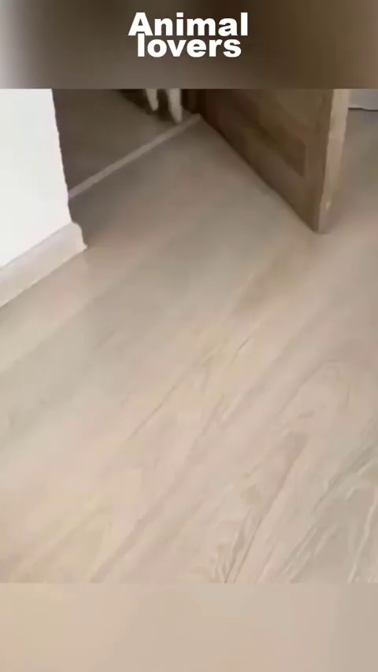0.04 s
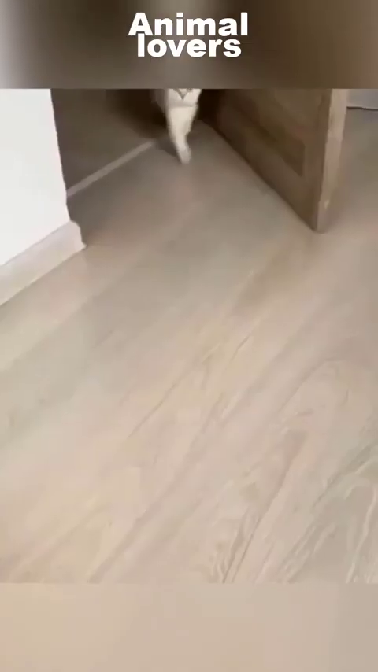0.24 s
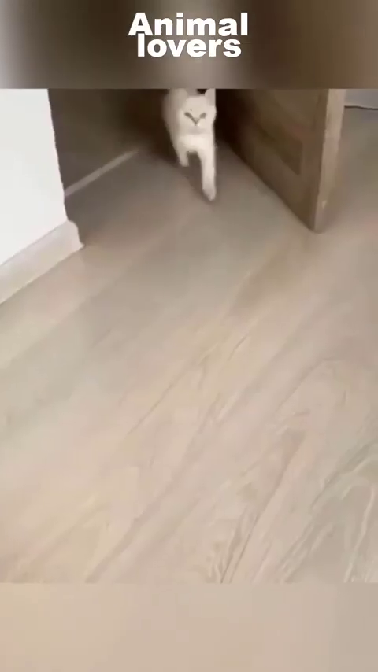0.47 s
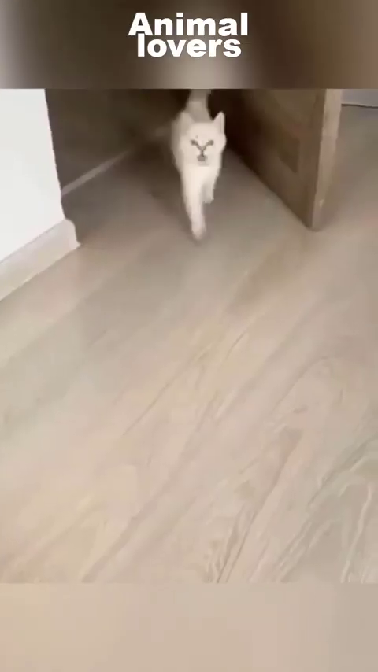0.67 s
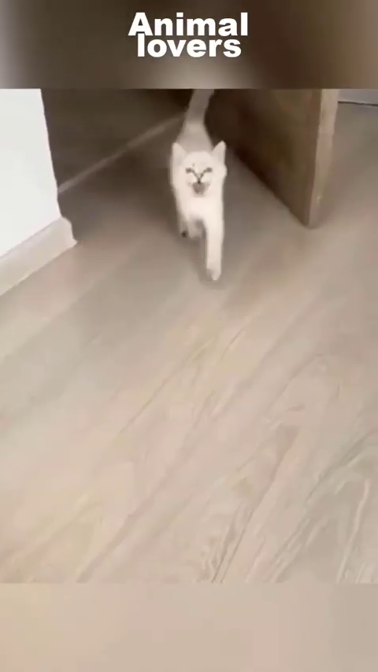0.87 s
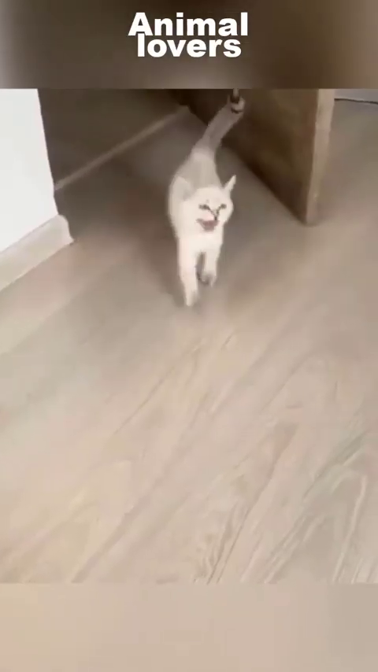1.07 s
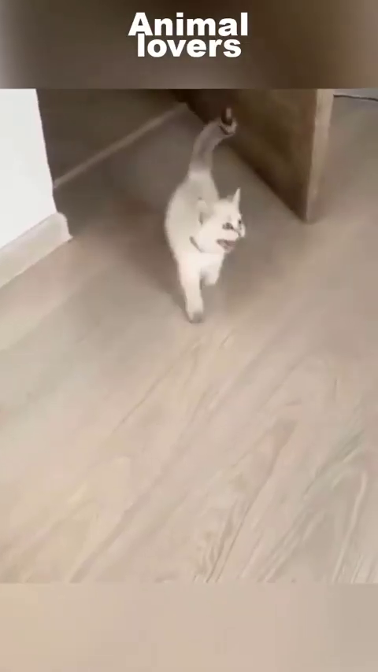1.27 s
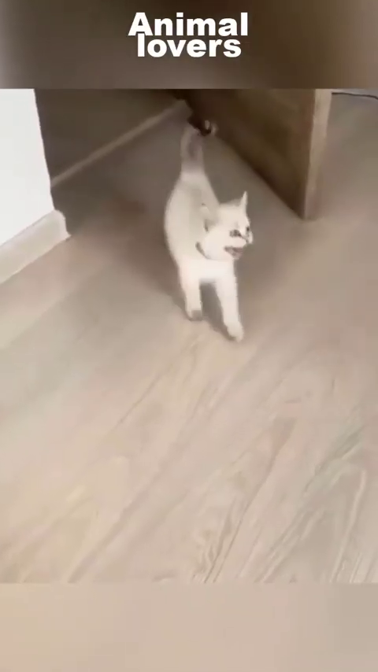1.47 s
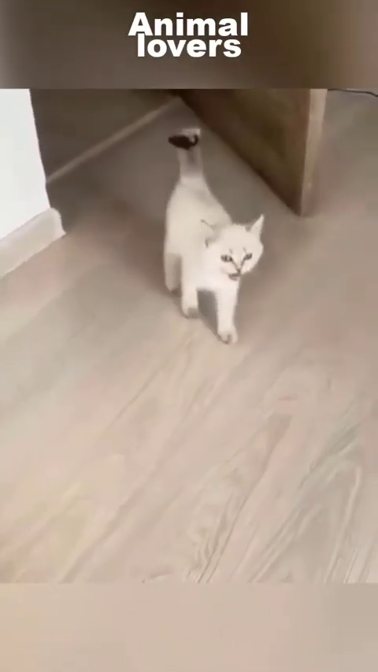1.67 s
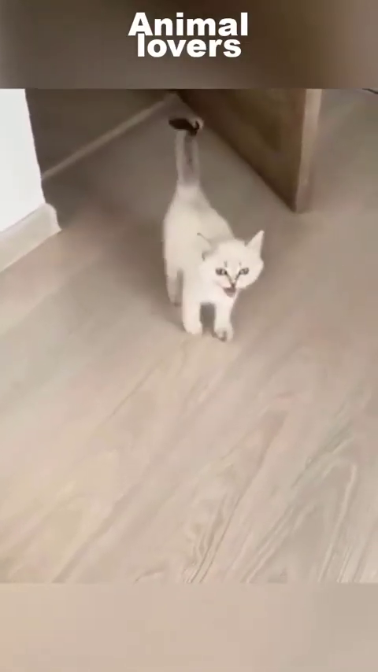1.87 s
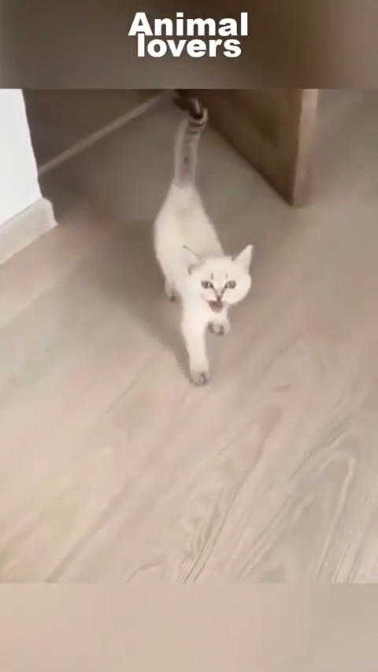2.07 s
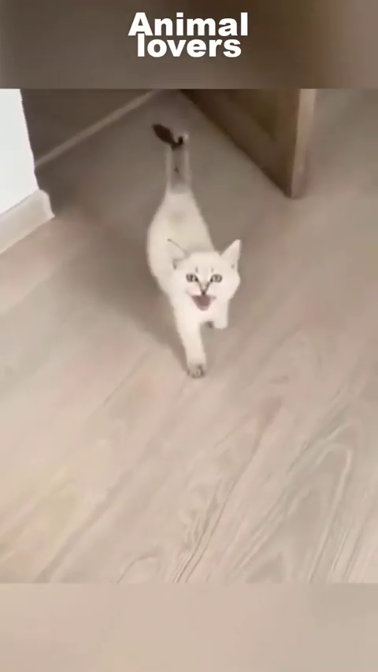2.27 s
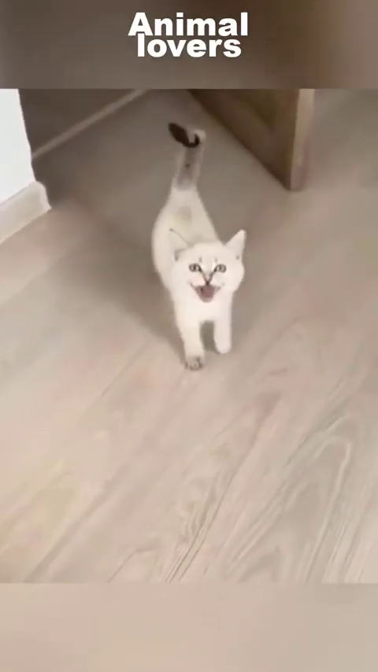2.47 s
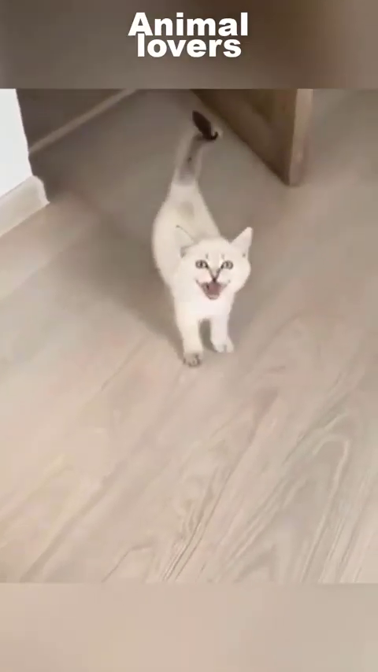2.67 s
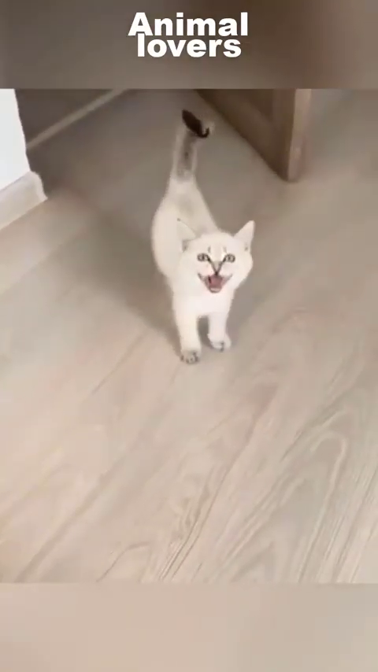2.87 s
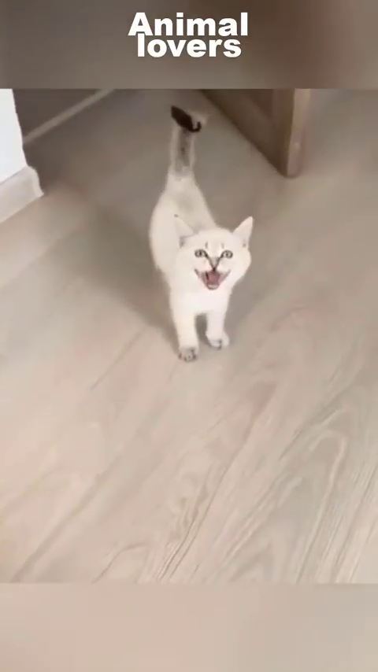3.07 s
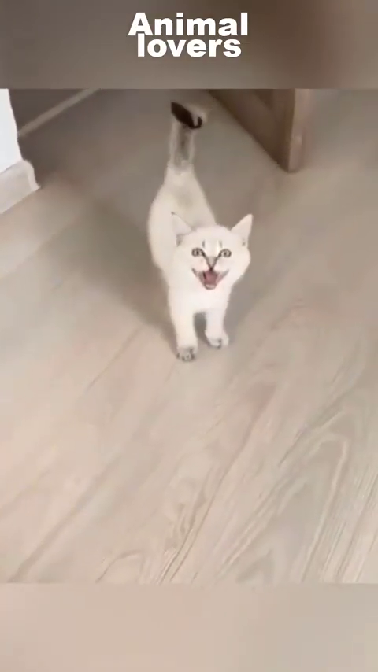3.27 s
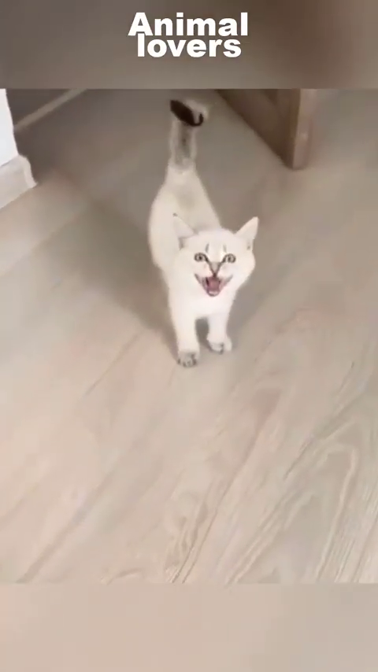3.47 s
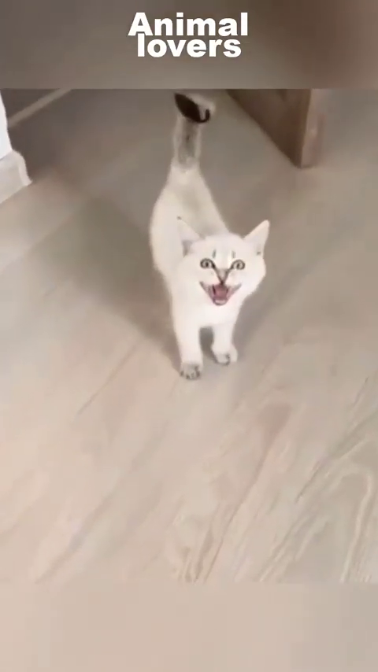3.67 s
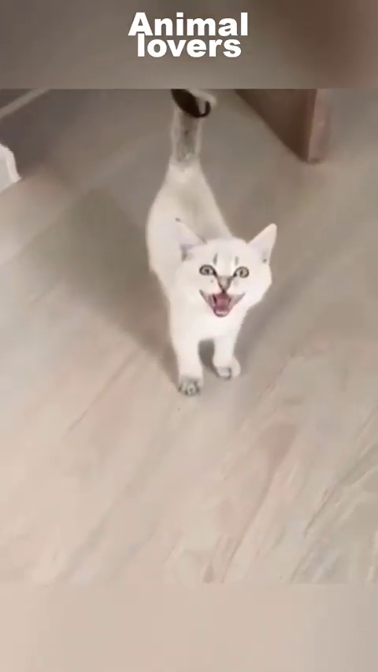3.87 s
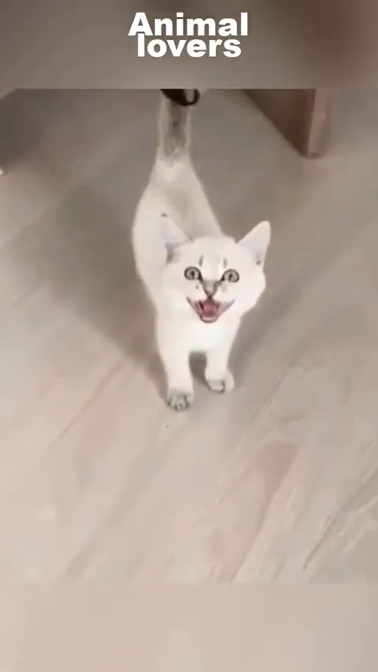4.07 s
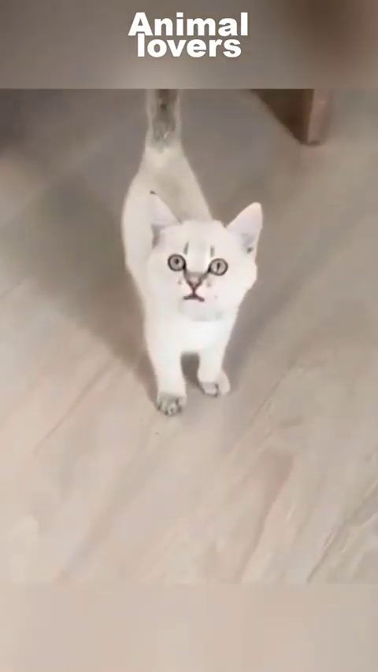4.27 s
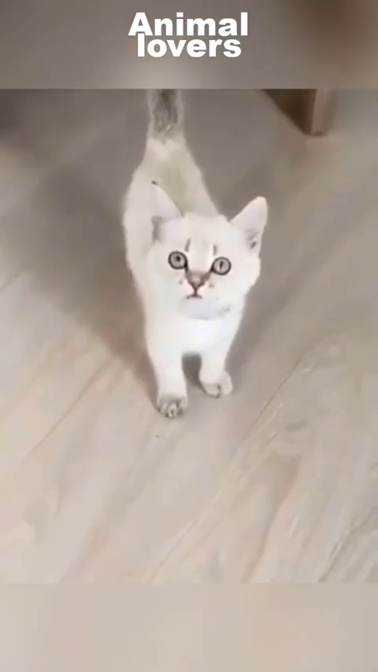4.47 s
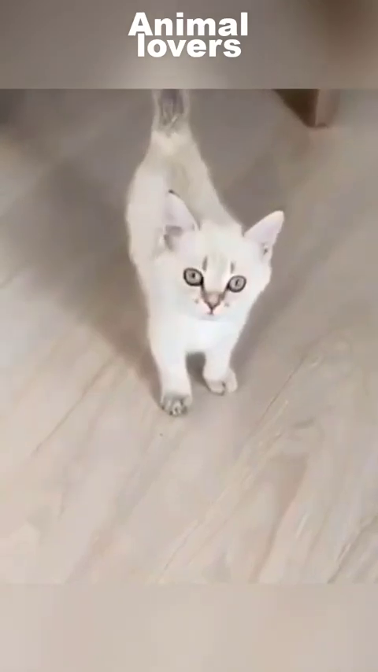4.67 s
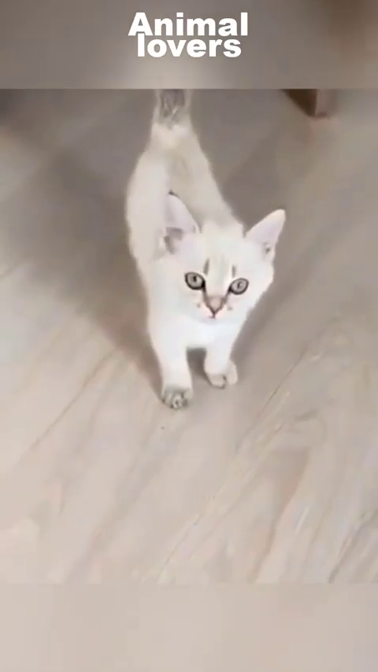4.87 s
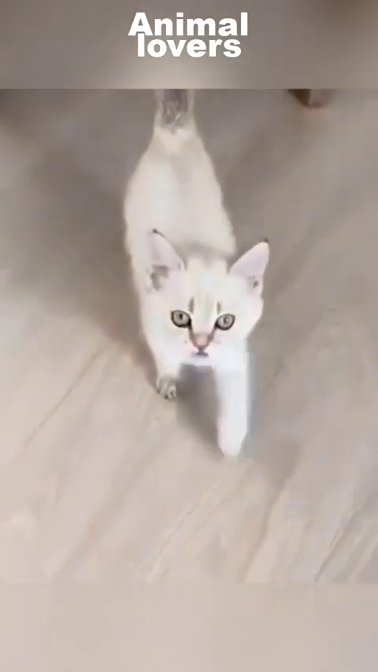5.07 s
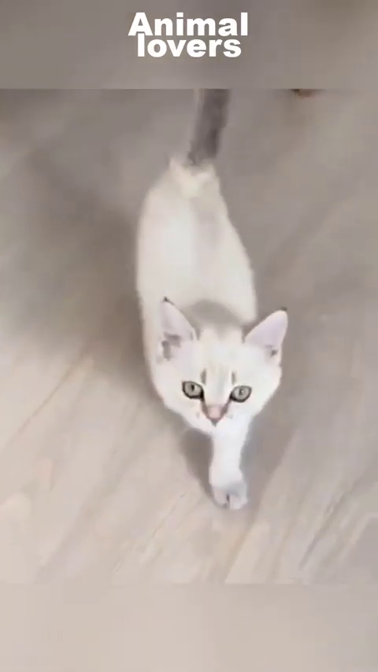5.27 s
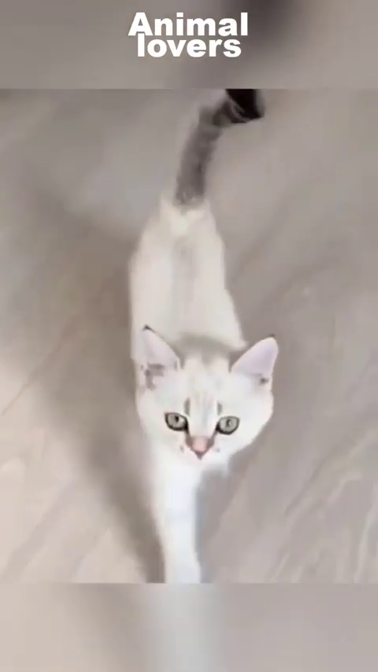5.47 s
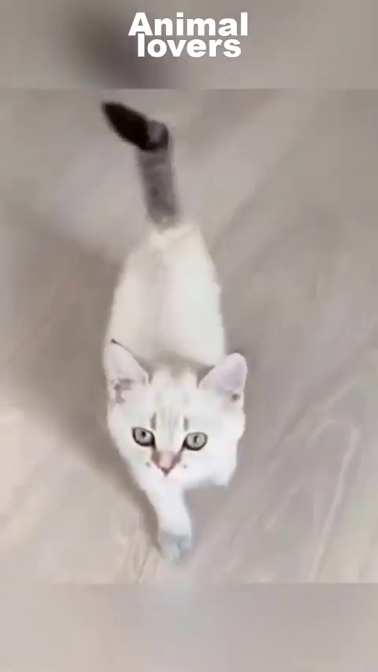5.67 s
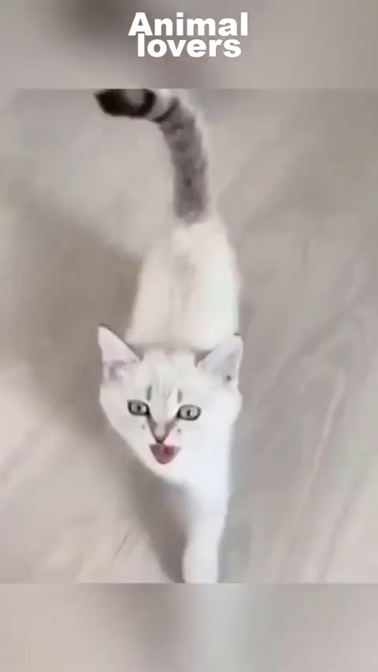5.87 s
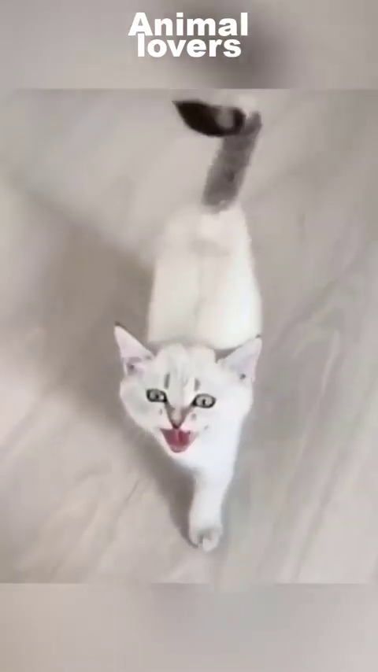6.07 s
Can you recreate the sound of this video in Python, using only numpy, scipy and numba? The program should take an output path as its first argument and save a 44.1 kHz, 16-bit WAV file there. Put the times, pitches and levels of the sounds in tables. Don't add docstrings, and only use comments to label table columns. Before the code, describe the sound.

A kitten gives one long, high, wavering meow that swells and sinks, cracks shut, then lip smacks, claw ticks and a new rough cry starting.

```python
import sys
import numpy as np
from scipy import signal
from scipy.fft import rfft, irfft
from scipy.io import wavfile
from scipy.ndimage import uniform_filter1d
from numba import njit

SR = 44100
rng = np.random.default_rng(int(sys.argv[2]) if len(sys.argv) > 2 else 0)


def volts(x):
    e = np.asarray(x, float) / 20
    return 10 ** e


def wav_out(sig):
    wavfile.write(sys.argv[1], SR, np.round(np.clip(np.atleast_2d(sig).T, -1, 1) * 32767).astype(np.int16))


N = 270333
T = np.arange(N) / SR
STEP = 32
BAND = 16

# t/s, f/Hz
RISE_HZ = [(1.02, 862), (1.086, 1000), (1.125, 952), (1.226, 1037), (1.27, 945), (1.335, 892), (1.41, 912),
           (1.635, 835), (1.9, 822)]
# t/s, f/Hz
HOLD_HZ = [(2.03, 878), (2.11, 901), (2.325, 891), (2.4, 857), (2.8, 841), (2.99, 819), (3.45, 808),
           (3.8, 795), (4.16, 787)]
# t/s, level/dB
ATTACK_DB = [(1.0, -59), (1.108, -43), (1.196, -47), (1.268, -35), (1.344, -41.5), (1.4, -36)]
# t/s, level/dB
EFFORT_DB = [(1.5, -38.5), (1.58, -34), (1.85, -39), (2.54, -26.5), (3.3, -27.5), (3.58, -20.5),
             (3.96, -24), (4.0, -19), (4.33, -24)]
# t/s, roughness/0-1
ROUGHNESS = [(1.0, .6), (1.07, .12), (1.12, .06), (1.45, .04), (2.7, .035), (3.4, .04), (4.17, .055),
             (4.22, .22), (4.33, .33)]
# t/s, pitch dip/share, added roughness/0-1, roughness length/s
CATCHES = [
    (1.676, .04, .26, .03),
    (2.39, .01, .06, .03),
    (3.72, 0, .03, .08),
    (4.242, .06, .04, .01),
    (4.275, .06, .04, .01),
    (4.312, .06, .04, .01),
    (4.332, .05, 0, .01),
    (4.352, .07, 0, .01),
]
# t/s, length/s, level/dB
FUNDAMENTAL_FADES = [
    (1.617, 0.11, -7.5),
    (2.508, 0.043, -32),
    (3.241, .03, -10),
    (3.5, 0.14, -4.5),
]
# t/s, first resonance/Hz, second resonance/Hz, lift of second/dB
MOUTH = [(1.05, 2160, 4790, 7), (1.3, 2050, 5820, -5.5), (1.65, 2050, 3150, 14.5), (1.9, 2190, 3390, -5.5),
         (2.3, 2440, 3830, 15), (2.9, 2310, 3420, 8.5), (3.25, 2360, 3770, 7.5), (3.55, 2400, 3980, 14.5),
         (4.2, 1780, 3866, 17.5)]
# f/Hz, level/dB
THROAT_DB = [(1100, -8.5), (1700, 1), (2500, -0.5), (3150, -1.5), (4000, -1), (5000, -0.5), (5800, -2.5),
             (6500, -15.5)]
# f/Hz, level/dB
TREBLE_DB = [(6500, -32), (7400, -15), (8000, 2.5), (9500, 6), (11000, 0), (13000, -15.5), (14000, -20)]
# level/dB, pitch/Hz, fundamental/dB, second resonance/Hz
NEXT_CRY = (-36, 829.5, -2.2, 2288)
# t/s, peak/dB, ring/Hz, lower ring/dB, hoarse air after/dB
SMACKS = [
    (0.387, -41, 4900, -19, -24),
    (0.789, -43, 5030, -22, -32),
    (0.919, -51, 2800, -22, -30),
    (0.943, -31.5, 5200, -38, -17),
    (1.049, -29.5, 5560, -35, -26),
    (5.5379, -18, 4720, -8.5, -27),
    (5.7948, -24, 4200, -22, -25.5),
    (6.0142, -13, 4770, -3.5, -27.5),
]
# t/s, peak/dB, ring/Hz
TICKS = [
    (4.448, -25.5, 1063),
    (5.048, -45.5, 2090),
    (5.109, -41.5, 975),
    (5.236, -45, 939),
    (5.335, -43, 1057),
    (5.484, -45.5, 990),
    (6.11, -28, 843),
]
# t/s, peak/dB, f/Hz, t60/s, swell/s
BUMPS = [
    (.99, -49.5, 745, 0.028, 0.017),
    (3.36, -38, 624, 0.015, 0.0061),
    (3.696, -19.5, 551, 0.032, 0.02),
    (4.452, -28, 199, 0.11, 0.007),
    (4.47, -33, 363, 0.061, 0.0038),
]
# t/s, rise/s, fall/s, handling/dB, rumble re handling/dB
STIRS = [(.48, 0.055, 0.061, -47.5, -3), (.6, 0.071, 0.034, -45, -5), (.88, 0.21, 0.034, -57, 2.5),
         (1.0, 0.015, 0.089, -67, 11.5), (4.45, 0.034, .1, -41, -24), (4.82, .03, .06, -57, 11.5),
         (5.18, 0.083, 0.059, -43.5, 0.5), (5.26, 0.097, 0.13, -42.5, -8), (5.56, 0.051, 0.026, -47.5, 0),
         (5.67, .02, .05, -49.5, 2.5), (5.79, 0.074, 0.25, -46, -0.5), (6.06, .12, .2, -49, 0)]
# t/s, rise/s, fall/s, level/dB, sheen re level/dB
SCUFFS = [(.4, 0.17, 0.054, -79, 3.5), (.56, 0.11, 0.095, -66.5, -9), (.784, 0.017, .04, -71, 2),
          (.95, 0.034, 0.9, -66, 2), (4.75, 2.28, 0.28, -53, -22.5), (5.14, 0.096, 0.06, -61.5, -19),
          (5.23, 0.06, 0.088, -55.5, -9), (5.345, 0.06, 0.032, -54.5, -4), (5.486, 0.01, 0.028, -53.5, -11),
          (5.57, .02, 0.037, -63, 5), (5.67, 0.01, 0.11, -51.5, -22), (5.81, .04, 0.067, -49.5, -7.5),
          (5.95, .08, 0.087, -58, -10.5), (6.06, 0.028, 0.13, -45, -10)]
# f/Hz, level/dB per Hz
RUMBLE_SPECTRUM = [(12, -5.5), (20, -11), (65, 4), (85, 3.5), (129, -4), (140, -20), (180, -44),
                   (310, -120)]
# f/Hz, level/dB per Hz
HANDLING_SPECTRUM = [(82, -27), (140, 3.5), (296, -1.5), (372, -6), (524, -17.5), (700, -18), (910, -25),
                     (1540, -120)]
# f/Hz, level/dB per Hz
SHUFFLE_SPECTRUM = [(290, -12), (500, 0), (1000, -4), (1630, -2), (2250, -2.5), (2750, -3.5), (6500, -12),
                    (8450, -84.5), (14300, -120)]
# f/Hz, level/dB per Hz
SHEEN_SPECTRUM = [(3820, -50), (6500, -11.5), (8180, -5), (8990, -5.5), (11100, -3), (13200, -16.5),
                  (13500, -30)]
# f/Hz, t60/s
ROOM_T60 = [(200, .45), (1000, .45), (3000, .42), (4500, .36), (6500, .3), (12000, .18)]
# t/s, level/dB
WETNESS_DB = [(1.0, 1), (2.2, -2.5), (3.0, -6), (4.35, -8.5), (6.1, 0)]
# start/s, end/s, level/dB
DROPOUT = (0.16, .214, -36)
# start/s, end/s
WIDE_SPANS = [(0, 1.06), (4.34, 4.46), (4.48, 5.19), (5.37, 5.49), (5.54, 5.79), (5.82, 6.13)]

EASY_DB = -32.5
BASE_DB, BASE_PER_DB, TOP_DB, TOP_PER_DB = -17, -0.52, -18.5, -0.33
WANDER = 0.036
UNSTEADY, SETTLES_S = .01, .8
TIRES_S, SAG_PER_S = 4.19, .12
SHUT_S, SHUT_LENGTH_S, RELEASE_DB_PER_S = 4.335, .12, 2596
PITCH_DROP, FIRST_DROP, SECOND_DROP = .28, 0.61, .62
SHUT_DB, SHUT_TOP_DB = -10.5, -8
NEXT_CRY_S = 6.109
RUMBLE_DB, HANDLING_DB, SHUFFLE_DB, SHEEN_DB = -57, -62.5, -69.5, -95
HUSH_DB = -12.5


def level(x):
    return x / np.sqrt(np.mean(x ** 2))


def shape(points, hz):
    f, v = np.transpose(points)
    return np.interp(np.log(np.maximum(hz, 1)), np.log(f), v)


def columns(*tables):
    s, *cols = np.transpose(np.concatenate(tables))
    return [np.interp(T, s, c) for c in cols]


def fine(control):
    return np.interp(T, T[::STEP], control)


def coloured(points):
    hz = np.arange(N // 2 + 1) * SR / N
    return level(irfft(rfft(rng.standard_normal(N)) * volts(shape(points, hz)), N))


def walk(rate_hz):
    k = int(SR / rate_hz)
    held = np.repeat(rng.standard_normal(N // k + 1), k)
    return level(uniform_filter1d(uniform_filter1d(held, k), k)[:N])


@njit
def svf(x, hz, width_hz):
    y, b, l = np.empty(len(x)), 0., 0.
    for i in range(len(x)):
        g, k = np.tan(np.pi * hz[i] / SR), width_hz / hz[i]
        v = (b + g * (x[i] - l)) / (1 + g * (g + k))
        b, l, y[i] = 2 * v - b, l + 2 * g * v, k * v
    return y


def ring(hz, t60_s):
    t = T[:SR // 4]
    return np.sin(2 * np.pi * hz * t) * np.exp(-np.log(1000) * t / t60_s)


def add(track, s, sound):
    i = int(s * SR)
    track[i:i + len(sound)] += sound[:N - i]


def kitten():
    db, hz, rough, base_db, first_hz, second_hz, top_db, second_db = controls()
    dips = sum(share * np.exp(-((T - s) / .006) ** 2) for s, share, *_ in CATCHES)
    shake = .0035 * walk(40) + .002 * walk(130)
    shake = shake + .05 * rough * walk(160) + .015 * rough * walk(400) + .08 * rough ** 2 * walk(700)
    shake = shake + UNSTEADY * walk(110) * np.exp(-np.abs(T - RISE_HZ[0][0]) / SETTLES_S)
    phase = 2 * np.pi * np.cumsum(hz * (1 - dips + shake)) / SR

    low, high, power, top_power = 0, 0, 0, 0
    for k in range(2, 19):
        f, first, second = k * hz[::STEP], first_hz[::STEP], second_hz[::STEP]
        first_lift = 2.0 / (1 + ((f - first) / 500) ** 2)
        second_lift = volts(second_db[::STEP]) / (1 + ((f - second) / 330) ** 2)
        gain = volts(shape(THROAT_DB, f)) * (1 + first_lift + second_lift) * (f < 6700)
        top = volts(shape(TREBLE_DB, f)) * (f >= 6700) * (f < 14500)
        wave = np.sqrt(2) * np.cos(k * phase + .4 * k * k) * volts(2.0 * walk(60))
        low = low + fine(gain) * wave
        high = high + fine(top) * wave
        power = power + gain ** 2
        top_power = top_power + top ** 2
    tone = volts(base_db) * np.sqrt(2) * np.cos(phase)
    tone = tone + low / fine(np.sqrt(power)) + volts(top_db) * high / fine(np.sqrt(top_power))

    puff = rng.standard_normal(N) * (1 + 0.91 * np.cos(phase))
    second_air = svf(svf(puff, second_hz, 900.), second_hz, 900.)
    mouth = level(svf(puff, first_hz, 500.) + 1.8 * second_air)
    teeth_hz = 5600 + 0 * T
    teeth = level(svf(svf(puff, teeth_hz, 2000.), teeth_hz, 2000.))
    teeth = teeth * volts(-6 + 4.0 * walk(12) - 3 * rough ** 2)
    teeth = teeth + volts(top_db + 15.5) * coloured(TREBLE_DB)
    flutter = volts(5 * rough * walk(150))
    voice = (1 - .55 * rough ** 2) * tone + rough ** 2 * mouth + rough ** 1.3 * teeth
    return volts(db) * flutter * voice


def controls():
    again_db, again_hz, again_base_db, again_second_hz = NEXT_CRY
    first_hz, second_hz, second_db = columns(MOUTH)
    shut = np.clip((T - SHUT_S) / SHUT_LENGTH_S, 0, 1)
    again = T > 5
    effort_db = columns([(.98, -104.5)], ATTACK_DB, EFFORT_DB)[0]
    push_db = np.maximum(effort_db - EASY_DB, -8)

    db = effort_db + SHUT_DB * shut - RELEASE_DB_PER_S * np.maximum(T - SHUT_S - SHUT_LENGTH_S, 0)
    db = np.where(again, again_db + np.minimum((T - NEXT_CRY_S) * 1e4, 0), db)
    fall = 1 - PITCH_DROP * shut ** 1.3 - SAG_PER_S * np.maximum(T - TIRES_S, 0)
    hz = np.where(again, again_hz, columns(RISE_HZ, HOLD_HZ)[0] * fall)

    rough = columns(ROUGHNESS)[0]
    rough = rough + sum(more * np.exp(-((T - at) / wide) ** 2) for at, _, more, wide in CATCHES)
    rough = np.where(again, .5, np.minimum(rough + shut, .9))

    first_hz = first_hz * (1 + WANDER * walk(21)) * (1 - FIRST_DROP * shut ** 0.58)
    first_hz = np.where(again, 1500, first_hz)
    second_hz = second_hz * (1 + WANDER * walk(7)) * (1 - SECOND_DROP * shut ** 2.66)
    second_hz = np.where(again, again_second_hz, second_hz)

    base_db = np.where(again, again_base_db, BASE_DB + BASE_PER_DB * push_db + 2.5 * walk(12))
    base_db = base_db + sum(fade_db * np.exp(-((T - at) / wide) ** 2) for at, wide, fade_db in FUNDAMENTAL_FADES)
    top_db = TOP_DB + TOP_PER_DB * push_db + SHUT_TOP_DB * shut + 0.55 * walk(12)
    return np.maximum(db, -120), hz, rough, base_db, first_hz, second_hz, top_db, second_db + 3.02 * walk(11)


def smacks():
    out, air = np.zeros(N), coloured(THROAT_DB)
    for s, db, hz, low_db, air_db in SMACKS:
        crackle = rng.standard_normal(400) * np.exp(-np.abs(T[:400] - .004) / .0009)
        cavity = ring(hz, .007) + .7 * ring(1.3 * hz, .006) + volts(low_db) * ring(1600, .014)
        cavity = cavity + 2.5 * np.exp(-T[:SR // 4] * SR / 1.2)
        snap = np.convolve(crackle, cavity)
        add(out, s - .003, volts(db) * snap / np.abs(snap).max())
        out += volts(db + air_db) * air * (T > s + .004) * np.exp(-np.maximum(T - s, 0) / 0.075)
    return out


def ticks():
    out = np.zeros(N)
    for s, db, hz in TICKS:
        scratch = rng.standard_normal(SR // 4) * np.exp(-T[:SR // 4] / 0.0026)
        tick = ring(hz, 0.032) + 0.74 * ring(2196, 0.025) + .5 * uniform_filter1d(scratch, size=5)
        add(out, s, volts(db) * tick)
    return out


def bumps():
    out, rustle = np.zeros(N), coloured([(200, -17.5), (600, -3), (2000, -20.5), (4000, -27)])
    for s, db, hz, t60_s, swell_s in BUMPS:
        push = np.hanning(int(SR * swell_s))
        modes = ring(hz, t60_s) + .5 * ring(0.946 * hz, t60_s)
        body = np.convolve(modes, push * np.cos(2 * np.pi * hz * T[:len(push)]))
        add(out, s, volts(db) * 2.38 * body / push.sum())
        slope_s = np.where(T < s + swell_s, swell_s, .06)
        out += volts(db - 21.5) * rustle * np.exp(-np.abs(T - s - swell_s) / slope_s)
    return out


def room(x):
    hz, t, frames = signal.stft(rng.standard_normal(SR), SR, nperseg=256)
    tail = signal.istft(frames * volts(-60 * t / shape(ROOM_T60, hz)[:, None]), SR)[1]
    tail = tail * np.clip((T[:len(tail)] - .003) / 0.0081, 0, 1)
    return signal.fftconvolve(x, tail / np.linalg.norm(tail))[:N]


def swells(events, rest_db, other_rest_db):
    main, other, t = volts(rest_db) ** 2, volts(other_rest_db) ** 2, T[::STEP]
    for s, rise_s, fall_s, db, other_db in events:
        swell = volts(db) * np.exp(-np.abs(t - s) / np.where(t < s, rise_s, fall_s))
        main = main + swell ** 2
        other = other + (volts(other_db) * swell) ** 2
    return fine(np.sqrt(main)), fine(np.sqrt(other))


def house():
    handling, rumble = swells(STIRS, HANDLING_DB, RUMBLE_DB)
    shuffle, sheen = swells(SCUFFS, SHUFFLE_DB, SHEEN_DB)
    lows = rumble * volts(2.2 * walk(9)) * coloured(RUMBLE_SPECTRUM)
    lows = lows + handling * volts(3.8 * walk(25)) * coloured(HANDLING_SPECTRUM)
    highs = shuffle * volts(1.2 * walk(12.0)) * coloured(SHUFFLE_SPECTRUM)
    highs = highs + sheen * volts(1.6 * walk(43)) * coloured(SHEEN_SPECTRUM)
    hush = volts(HUSH_DB * (T < DROPOUT[0] + .02))
    return hush * (lows + highs) + volts(-79.0) * rng.standard_normal(N)


def scene():
    voice, knocks = kitten(), smacks() + ticks()
    start, end, drop_db = DROPOUT
    gate = volts(drop_db * np.interp(T, [start - .006, start + 0.0066, end - .004, end + 0.003], [0, 1, 1, 0]))
    reverb = room(volts(columns(WETNESS_DB)[0]) * voice + volts(-12.0) * knocks)
    mono = gate * (volts(-1.0) * voice + knocks + reverb + bumps() + house())
    return np.array([mono, mono])


def steady(x, knee_db=-27, ratio=1.3):
    envelope = np.sqrt(np.abs(uniform_filter1d(x ** 2, size=700)) + 1e-12)
    return x * np.minimum(1, volts(knee_db) / envelope) ** (1 - 1 / ratio)


def band_limit(x):
    return signal.sosfilt(signal.butter(12, 13820, fs=SR, output="sos"), x)


def record(dry):
    hz, t, spec = signal.stft(steady(dry.mean(axis=0)), SR, nperseg=2048, noverlap=1536)
    mask = uniform_filter1d(np.abs(spec) ** 2, size=71, axis=0)
    depth_db = 23.5 + 16 * np.clip(1 - hz / 1800, 0, 1)
    kept = spec * (np.abs(spec) ** 2 > mask * volts(-2 * depth_db)[:, None])

    copy = np.zeros_like(spec)
    copy[19 * BAND:32 * BAND] = kept[3 * BAND:16 * BAND]
    copy[32 * BAND:39 * BAND] = kept[4 * BAND:11 * BAND]
    split_hz = hz[19 * BAND]
    treble = spec * (hz >= split_hz)[:, None]
    wanted, there = (np.abs(uniform_filter1d(np.abs(z) ** 2, size=39, axis=0)) for z in (treble, copy))
    grain = np.exp(2j * np.pi * rng.random((2, *spec.shape)))
    top = copy * np.sqrt(wanted / (there + 1e-16)) + volts(-20) * np.sqrt(wanted) * grain[0]
    jitter = uniform_filter1d(rng.standard_normal(spec.shape), size=BAND, axis=0) * np.sqrt(BAND)
    top = top * volts(3.4 * jitter)
    top = top * (wanted > volts(-2 * 22) * uniform_filter1d(mask, size=201, axis=0))

    mid = np.where((hz < split_hz)[:, None], kept, top * (hz < 13250)[:, None])
    noisy = sum((t > a) & (t < b) for a, b in WIDE_SPANS)
    side = volts(-5.5) * np.sqrt(np.abs(mask)) * grain[1] * noisy * ((hz > 4200) & (hz < 13200))[:, None]
    mid, side = (signal.istft(z, SR, noverlap=1536)[1][:N] for z in (mid, side))
    return band_limit(np.array([mid + side, mid - side]))


dry = scene()
out = record(dry)
wav_out(out)
```